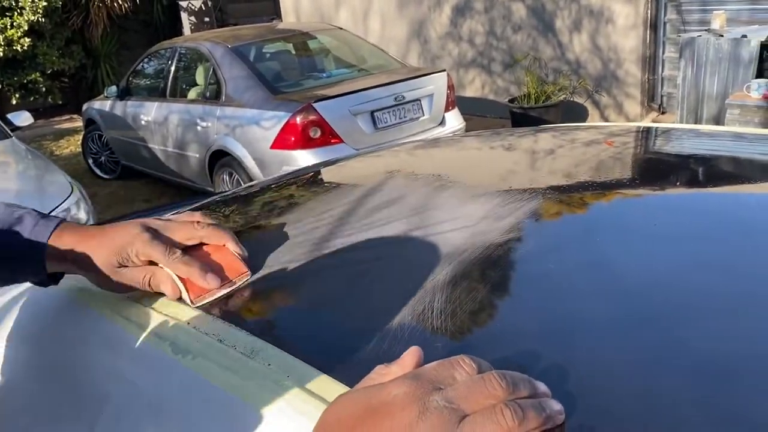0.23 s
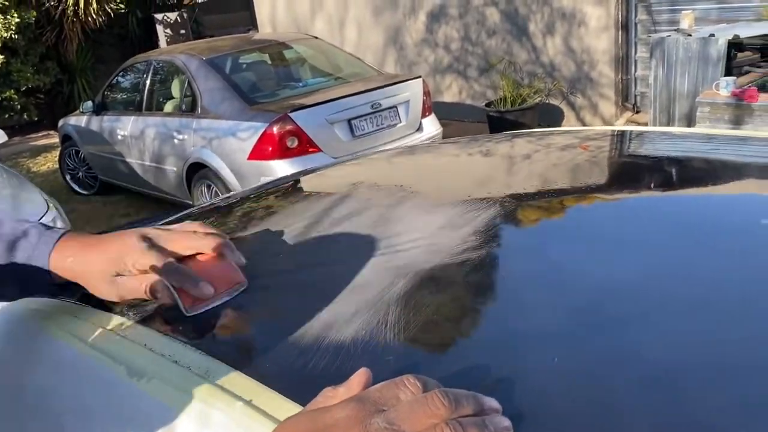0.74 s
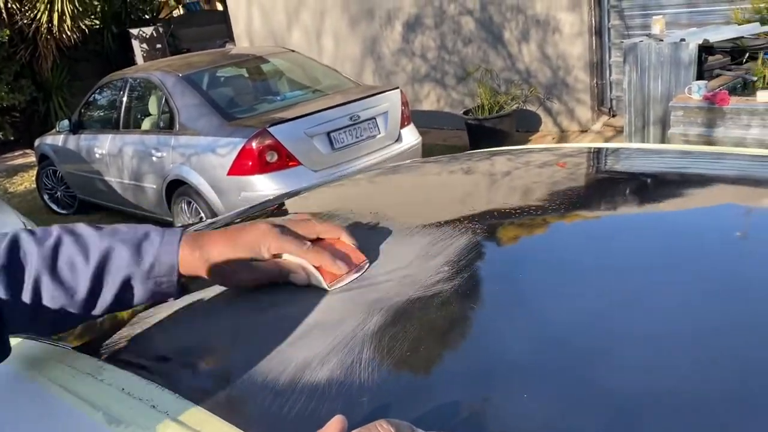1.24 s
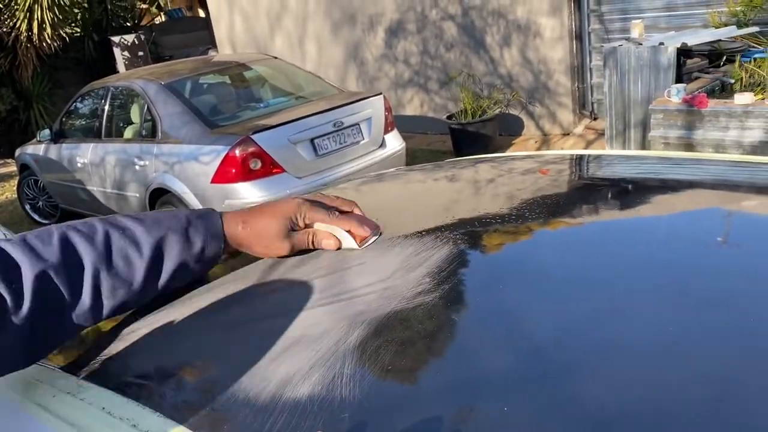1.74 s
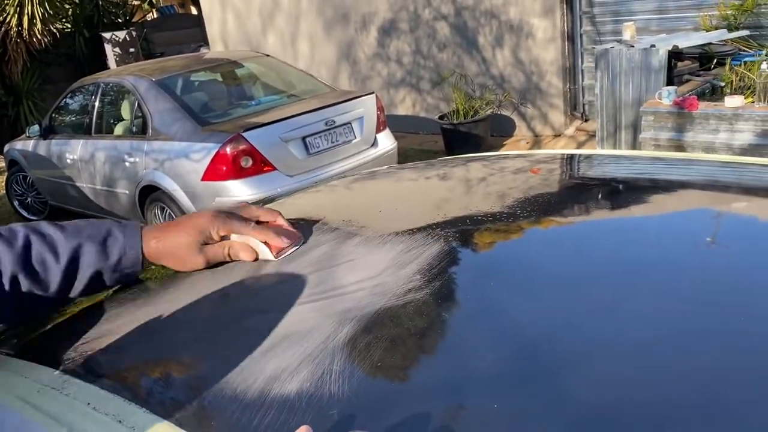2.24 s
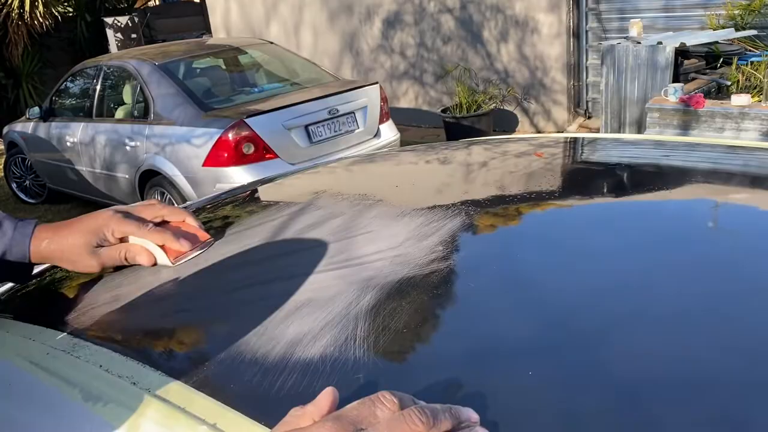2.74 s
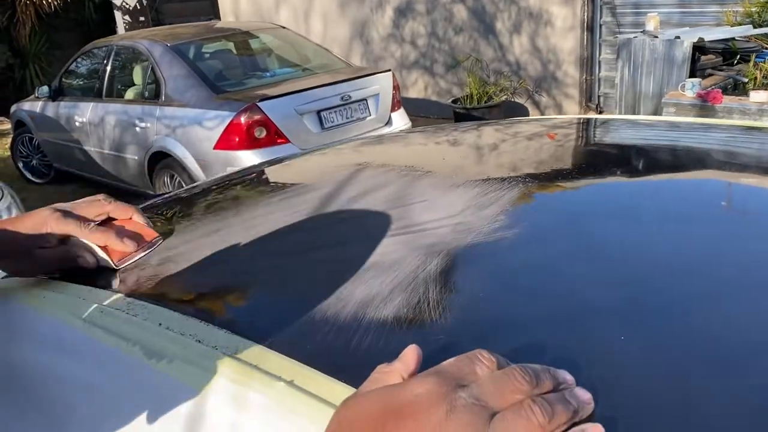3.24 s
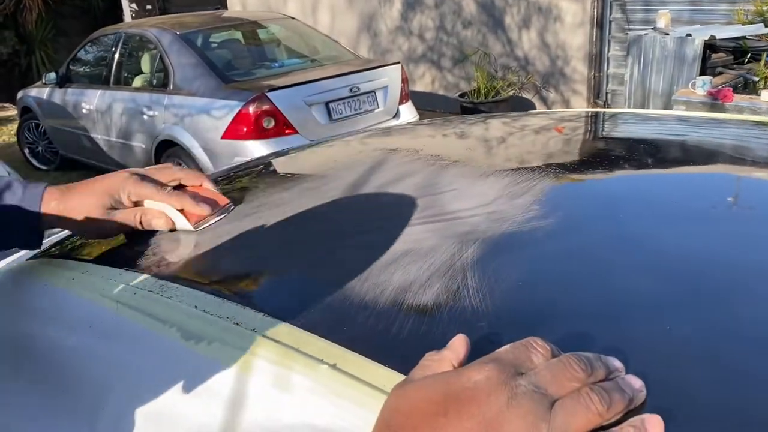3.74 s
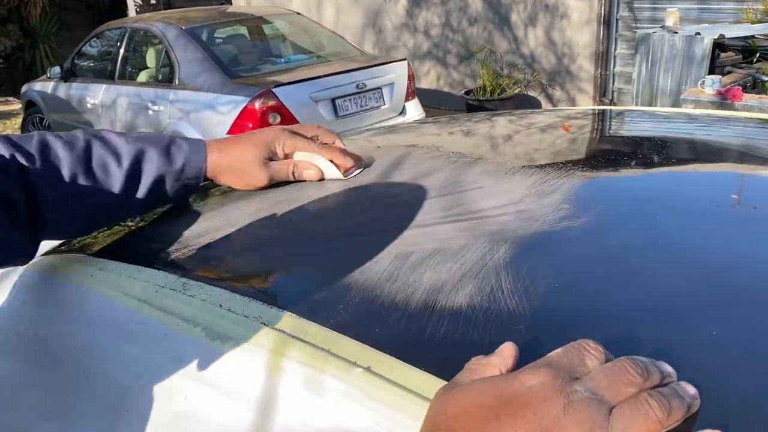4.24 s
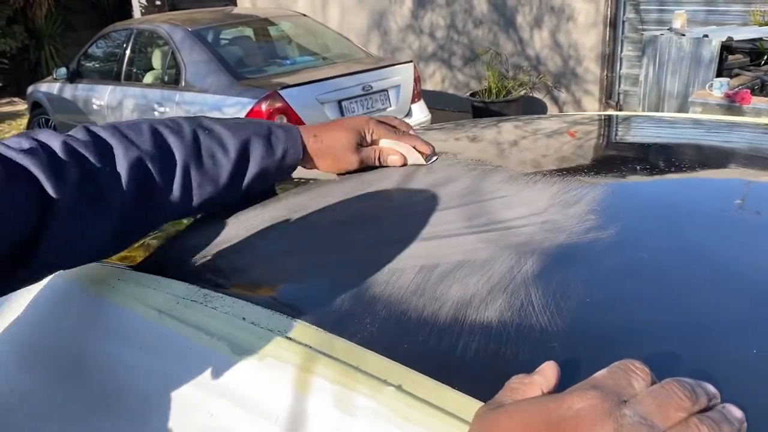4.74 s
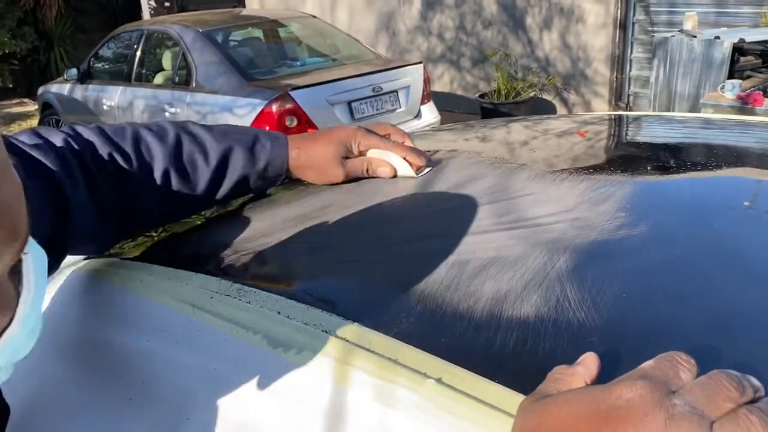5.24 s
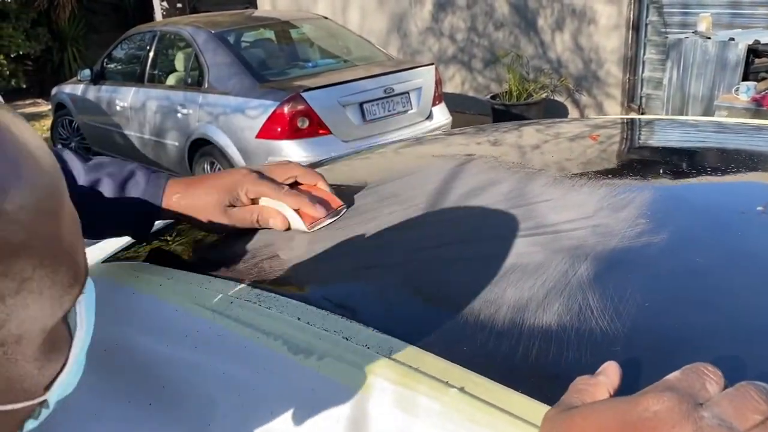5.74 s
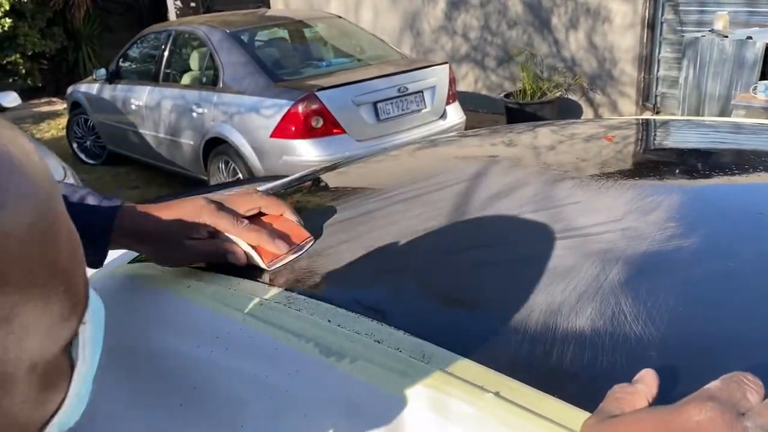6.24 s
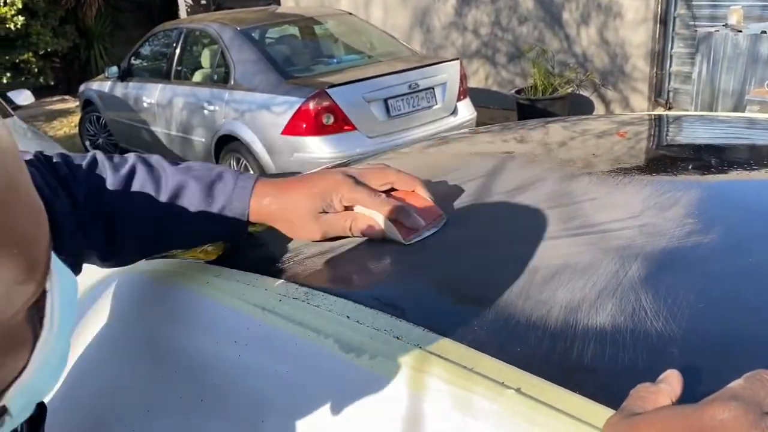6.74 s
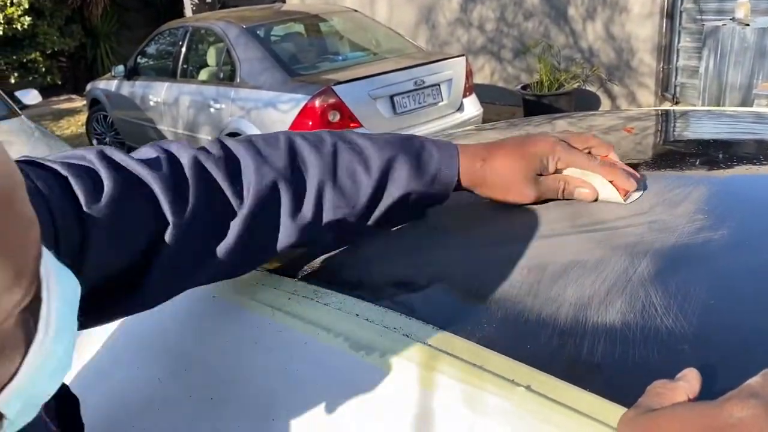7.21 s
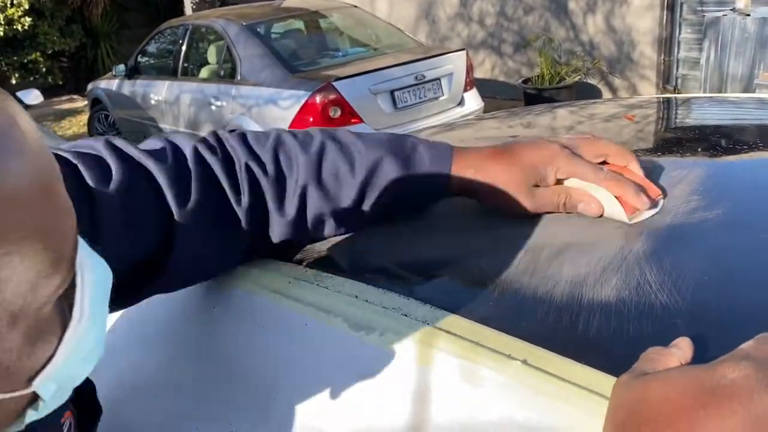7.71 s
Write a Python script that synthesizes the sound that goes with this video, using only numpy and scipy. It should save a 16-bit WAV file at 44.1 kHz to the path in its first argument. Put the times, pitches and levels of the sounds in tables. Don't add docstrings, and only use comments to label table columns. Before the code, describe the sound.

Rapid, dry, hissing sanding strokes on a car's sheet-metal roof swell and cut off at each turn, outdoors in a breezy yard.

```python
import sys
import numpy as np
from scipy import signal
from scipy.fft import rfft, irfft, next_fast_len
from scipy.io import wavfile

SR = 44100
rng = np.random.default_rng(int(sys.argv[2]) if len(sys.argv) > 2 else 0)


def generate_wav(sig):
    pcm = np.round(np.clip(np.atleast_2d(sig).T, -1, 1) * 32767).astype(np.int16)
    wavfile.write(sys.argv[1], SR, pcm)


def volts_from_db(level):
    exponent = np.asarray(level, float) / 20
    return 10 ** exponent


N = 351477
SIZE = next_fast_len(N + 4096)
HZ = np.maximum(np.arange(SIZE // 2 + 1) * SR / SIZE, 1)
STEP = 16
STEPS = np.arange(N // STEP + 2) * STEP / SR
LEFT_RIGHT = np.array([.5, -.5])


def rms_one(x):
    return x / np.sqrt(np.mean(x ** 2) + 1e-20)


def smooth(control):
    return np.interp(np.arange(N) / SR, STEPS, control)


def drift(rate_hz):
    r = np.exp(-2 * np.pi * STEP * rate_hz / SR)
    walk = signal.lfilter([1], [1, -2 * r, r * r], rng.standard_normal(len(STEPS) + 1000))
    return rms_one(walk[1000:])


def in_time(rows):
    start_s, *columns = np.transpose(rows)
    return [np.interp(STEPS, start_s, column) for column in columns]


def at_hz(rows, hz, column=1):
    table = np.array(rows)
    return np.interp(np.log(hz), np.log(table[:, 0]), table[:, column])


def shaped(x, response):
    return irfft(rfft(x, SIZE) * response, SIZE)[..., :N]


def peak(hz, width_hz):
    return 1 / (1 + 1j * (HZ ** 2 - hz ** 2) / (HZ * width_hz))


# pitch_hz, level_db (per Hz)
GRIT_COLOUR = [(500, -21.5), (1000, -14), (1500, -7.5), (2000, -4), (3000, -5.5), (4200, -6.5), (5400, -3),
               (6500, -3.5), (8000, -2.5), (9500, 0.5), (11500, 0), (13500, 0), (15500, -5.5)]
# pitch_hz, width_hz, level_db
SHEET_RINGS = [(1587, 200, -16.5), (1740, 96, -11.5), (2103, 424, -2.5), (2590, 220, -11), (8700, 1200, -4)]
# start_s, rasp_db, shift_db (rasp moved from 3 to 6 kHz in mid stroke), drone_db,
# speed_power (how much loudness hangs on speed)
TILT = [(0, -2, 0, -1.5, 1.7), (.55, 1, -1, -2.5, 1.36), (1.2, 2, 1, 2, 1.12), (1.9, 3, -0.5, 1.5, 1),
        (2.3, 3.5, 1, 3.5, 0.83), (2.8, 1, 1, 2.5, 1.16), (3.7, -0.5, 2.5, 0.5, 0.89), (4.6, -1, 4, 1.5, 1),
        (5.3, 0.5, 0.5, 2.5, 1.03), (5.9, -2, 1.5, 1.5, 0.89), (6.6, -1, -0.5, -1, 1.13),
        (7.2, -1.5, 0.5, -2, 1.28), (7.97, 0, -4, -3.5, 1.4)]


def sanding():
    speed, reach = block()
    grit_db, rasp_db, ring_db, drone_db = hand()
    tilt_db, shift_db, _, speed_power = in_time(TILT)
    rings = sum(volts_from_db(db) * peak(hz, width_hz) for hz, width_hz, db in SHEET_RINGS)
    colour = volts_from_db(at_hz(GRIT_COLOUR, HZ)) * (1 + rings)
    tear = (rfft(grains(22000, spread_db=2.0), SIZE) * colour).astype(np.complex64)
    centres_hz = np.geomspace(700, 14000, 11)
    place = np.interp(np.log(HZ), np.log(centres_hz), np.arange(len(centres_hz))).astype(np.float32)
    shared, own, together = 0, 0, drift(17)
    for k, hz in enumerate(centres_hz):
        window = np.cos(np.pi / 2 * np.clip(place - k, -1, 1)) ** 2
        band = irfft(tear * window, SIZE)[:, :N]

        sheet = np.interp(hz, [2300, 3200], [1, 0])
        bright = np.interp(hz, [5500, 8500], [0, 1])
        sheet_db = ring_db if hz > 1400 else drone_db
        tipped_db = tilt_db + shift_db * speed ** 2 * np.interp(hz, [3500, 5000], [-1, 1])
        level_db = grit_db + 6.5 + sheet * (sheet_db + 6)
        level_db = level_db + (1 - sheet - bright) * (rasp_db + 6 + tipped_db)
        faster = speed ** (speed_power * np.interp(np.log(hz), np.log([800, 12000]), [.75, .85]))
        gain = faster * volts_from_db(level_db + 0.22 * together + 2.1 * drift(14))

        near_far = [at_hz(PORTS, hz, column=2), at_hz(PORTS, hz, column=3)]
        alike = np.interp(reach ** np.interp(hz, [2500, 4000], [1, 3]), [0, 1], near_far)
        alike = np.clip(alike, 0, 1) / (1 + (0.17 / (speed + 1e-4)) ** 6)
        creep, creep_alike = volts_from_db(2 * (-80.5 - 6.5 * bright)), 0.1
        shared = shared + smooth(np.sqrt(alike * gain ** 2 + creep_alike * creep)) * band[0]
        own = own + smooth(np.sqrt((1 - alike) * gain ** 2 + (1 - creep_alike) * creep)) * band[1:]

    rocking = 0.067 * drift(15)
    heard = port_pair(shared, own, smooth((1 - reach) ** 1.4 + rocking))
    turned = heard * (volts_from_db(np.outer(LEFT_RIGHT, smooth(sideways(reach)))) - 1)
    return heard + shaped(turned, 1 / (1 + (HZ / 7800) ** 12) / (1 + (1800 / HZ) ** 4))


def grains(per_s, spread_db):
    size_draw, sign_draw, hit_draw = rng.random((3, 3, N), dtype=np.float32)
    sizes = volts_from_db(spread_db * np.minimum(-np.log(size_draw + 1e-9), 5)) * np.sign(sign_draw - .5)
    hits = hit_draw < per_s / SR
    return rms_one(sizes * hits * smooth(volts_from_db(0.59 * drift(108))))


# start_s (block breaks free), turn_db (grit at the turn),
# mid_db (grit halfway through the next stroke), ring_db (sheet re grit at the turn)
TURNS = [(-0.1, -21, -25, -7), (0.222, -36.5, -26, -7.5), (0.525, -29, -28.5, 4.5), (0.838, -41.5, -31, -3),
         (1.141, -30.5, -30.5, -4), (1.447, -42.5, -32.5, -7.5), (1.744, -38.5, -31.5, -2),
         (2.045, -44, -35, -13.5), (2.331, -40.5, -35.5, -8), (2.624, -44, -36.5, -11),
         (2.924, -33.5, -37.5, -10.5), (3.228, -41.5, -37, -8.5), (3.526, -40.5, -36.5, -7.5),
         (3.835, -41, -40.5, -11), (4.131, -37.5, -42, -14), (4.435, -37.5, -42, -12),
         (4.734, -36, -40, -11), (5.039, -39.5, -40.5, -11), (5.343, -35.5, -37.5, -7),
         (5.646, -41.5, -32, -12.5), (5.95, -39.5, -33.5, 0.5), (6.261, -41, -28.5, -10),
         (6.569, -34, -30, 3), (6.871, -41.5, -29, -4.5), (7.179, -29, -30, 3), (7.476, -41.5, -25.5, 0.5),
         (7.799, -26, -28, 5.5), (8.11, -27, -28, -5)]


def strokes():
    turn = np.arange(len(TURNS))
    stick_s = np.where(turn % 2, 0.0094, 0.016)
    return np.interp(STEPS, np.array(TURNS)[:, 0] - stick_s, turn)


def block():
    stroke = strokes()
    number = stroke.astype(int)
    push = number % 2
    since_free_s = STEPS - np.array(TURNS)[number, 0]
    slipping = np.clip(since_free_s / 0.0077 + .35, 0, 1) ** 2
    jerk = np.where(push, 0.33, 0.013) * np.exp(-np.maximum(since_free_s, 0) / 0.013)
    to_turn_s = (1 - stroke % 1) * 0.52
    drag = np.where(push, 0, 0.22) * np.exp(-to_turn_s / 0.016) * np.clip(to_turn_s / 0.0087, 0, 1)
    speed = (np.abs(np.sin(np.pi * stroke)) + jerk + drag) * slipping
    return speed, np.cos(np.pi * stroke / 2) ** 2


# press_share (part of it where the arm bears down most),
# damp_db (ring lost under the flat block)
STROKES = [(0.47, 9.5), (0.56, 15), (0.54, 16), (.5, 10.5), (0.52, 11.5), (0.54, 8), (0.41, 10),
           (0.76, 4.5), (0.35, 8.5), (0.63, 7), (0.57, 12), (0.63, 9), (0.33, 14), (.55, 0.5), (0.74, 3.5),
           (0.49, 5.5), (0.57, 6), (0.32, 5), (0.28, 5), (0.79, 2.5), (0.33, 4), (0.71, 2.5), (0.43, 6),
           (0.49, 4.5), (0.56, 8), (0.57, 14), (0.54, 9.5), (.5, 6)]
BITE = [-0.81, -0.54, -1.7, -0.055, .3, -0.26, .3, 0.025, -0.75, 0.6, .6, -.4, 0.83, -0.27, -0.14, -0.54,
        -.4, -0.55, -.4, -.4, -.4, 0.25, -1, -.4, -0.69, 0.52, -0.66, -.4]


def hand():
    stroke = strokes()
    number = stroke.astype(int)
    _, turn_db, mid_db, free_db = np.transpose(TURNS)
    press_share, damp_db = np.transpose(STROKES)
    turn = np.arange(len(TURNS))
    knots = np.ravel([turn, turn + np.clip(press_share, .1, .9)], order="F")
    grit_db = np.interp(stroke, knots, np.ravel([turn_db, mid_db], order="F"))
    mid, pull = np.sin(np.pi * stroke) ** 2, 1 - number % 2
    ring_db = np.interp(stroke, turn, free_db) - mid * damp_db[number]
    rasp_db = -2.5 + 0.35 * ring_db + np.array(BITE)[number] * mid
    drone_db = -0.5 + 0.52 * ring_db - 4 * mid * pull + in_time(TILT)[2]
    return grit_db, rasp_db, ring_db, drone_db


# start_s, near_end_db, middle_db, far_end_db
STANCE = [(0, 9, 6, 3), (.6, 11, 4.4, 2), (1.1, 3, 6.2, 4.5), (1.9, 1, 5.3, 5.5), (2.6, 2, 2.3, 4.5),
          (3.4, 0.4, 9.3, 8), (4.5, 3, 4.8, 6), (5.3, 8, 3.4, 1.5), (5.9, 4, 4.4, -1), (6.6, 7.5, 2, -1.5),
          (7.97, 7, 1.7, -1)]


def sideways(reach):
    near_db, mid_db, far_db = in_time(STANCE)
    near_half = near_db + 2 * reach * (mid_db - near_db)
    far_half = far_db + 2 * (1 - reach) * (mid_db - far_db)
    return np.where(reach < .5, near_half, far_half)


# pitch_hz, lead_rad (right port ahead), alike_near (0-1), alike_far (0-1), left_right_db
PORTS = [(300, .3, .8, .8, -.5), (800, .4, .4, .75, -3), (1800, -.3, .15, .85, -2),
         (3000, -1.3, .35, .5, 1), (4400, -.1, .92, .55, -1), (5600, -.3, .65, .55, 1),
         (6900, 0.1, .98, .9, -1), (8500, 3.1, .985, .985, 0), (10150, 6.28, .995, .995, 0),
         (11650, 9.36, .998, .998, 0), (12550, 9.5, .998, .998, 0), (13600, 12.4, .995, .995, 0),
         (14400, 12.75, .995, .995, 0), (15400, 15.71, .998, .998, 0)]
# pitch_hz, lead_rad, left_right_db
NEAR_SHIFT = [(1200, -0.13, 7), (2000, -1.1, -4), (3020, -0.9, 9), (3980, 0.92, 1.5), (5560, -1.3, -2.5),
              (8000, 0.4, 0.5), (11500, -0.31, -5.5), (13500, -0.95, 4), (14900, 0, -6)]


def port_pair(shared, own, near):
    port_hz, port_lead = np.array(PORTS)[:, :2].T
    lead = np.exp(-1j * np.outer(LEFT_RIGHT, np.interp(HZ, port_hz, port_lead)))
    moved = np.exp(-1j * np.outer(LEFT_RIGHT, at_hz(NEAR_SHIFT, HZ)))
    moved = moved * volts_from_db(np.outer(LEFT_RIGHT, at_hz(NEAR_SHIFT, HZ, column=2)))
    both = rfft(shared * (1 - near), SIZE) + rfft(shared * near, SIZE) * moved
    both = both * lead + rfft(own, SIZE)
    return irfft(both * volts_from_db(np.outer(LEFT_RIGHT, at_hz(PORTS, HZ, column=4))), SIZE)[:, :N]


# start_s, level_db (peak), pitch_hz, left_right_db, rise_s
KNOCKS = [
    (0.039, -37, 1150, 5, .0008),
    (0.257, -35, 950, 5, .0006),
    (0.593, -38, 1200, 11, .001),
    (0.797, -39.5, 1340, -4, 0.0028),
    (2.811, -44, 1130, -1, .003),
    (3.221, -44, 690, -3, 0.0015),
    (4.992, -40, 1400, -8, 0.0022),
    (7.104, -41, 1290, -3.5, .0018),
]


def knocks():
    out, t = np.zeros((2, N + SR)), np.arange(round(.03 * SR)) / SR
    for start_s, db, hz, pan_db, rise_s in KNOCKS:
        ring = np.sin(2 * np.pi * hz * t) * (t / rise_s) * np.exp(1 - t / rise_s)
        start = round(start_s * SR)
        out[:, start:start + len(t)] += volts_from_db(db - 1.0 + LEFT_RIGHT[:, None] * pan_db) * ring
    return out[:, :N]


# peak_s, rumble_db, flutter_db, fall_s
GUSTS = [(.0, -43, -51, 0.036), (.18, -54, -62, 0.018), (.27, -49, -62, 0.033), (.47, -54, -60, .015),
         (.56, -43.5, -47.5, .07), (.88, -43.5, -53, 0.033), (1.11, -48, -55, .05), (1.51, -43, -60, 0.05),
         (1.81, -47, -65, 0.021), (2.04, -41.5, -58, 0.03), (2.168, -32.5, -39.5, 0.036),
         (2.4, -35.5, -44, 0.045), (2.48, -33, -58, 0.018), (2.62, -39.5, -56, 0.049),
         (2.81, -47, -53, 0.03), (3.3, -51, -53, 0.046), (3.44, -37, -63, 0.016), (3.75, -48, -56, .04),
         (4.0, -47.5, -66, 0.12), (4.36, -50, -65, 0.051), (4.75, -46.5, -62, .04), (5.33, -48, -50, 0.06),
         (5.98, -41, -53, .03), (6.402, -41.5, -63, 0.018), (6.59, -46, -49, 0.054),
         (6.87, -40.5, -50, 0.03), (7.18, -38.5, -42, 0.064), (7.411, -34.5, -42.5, 0.018),
         (7.5, -35, -45, 0.02), (7.81, -33, -39, 0.015)]


def gusts():
    peak_s, rumble_db, flutter_db, fall_s = np.transpose(GUSTS)[:, :, None]
    width_s = fall_s * np.where(STEPS < peak_s, 0.95, 1)
    bell = np.exp(-((STEPS - peak_s) / width_s) ** 2)

    def over_breeze(breeze_db, gust_db):
        return np.sqrt(volts_from_db(2 * breeze_db) + (volts_from_db(2 * gust_db) * bell).sum(axis=0))

    return over_breeze(-51, rumble_db), over_breeze(-55.5, flutter_db)


def wind():
    rumble_gain, flutter_gain = gusts()
    white = rng.standard_normal((2, 3, N // STEP + 2))
    air = white[:, :1] + 0.39 * white[:, 1:]
    low = signal.butter(2, [47, 95], "band", fs=SR / STEP, output="sos")
    high = signal.butter(2, [105, 175], "band", fs=SR / STEP, output="sos")
    rumble = rms_one(signal.sosfilt(low, air[0]))
    flutter = rms_one(signal.sosfilt(high, air[1]))
    gust = volts_from_db(0.44 * drift(21)) * (rumble_gain * rumble + flutter_gain * flutter)
    return signal.resample_poly(gust, STEP, 1, axis=1)[:, :N]


# pitch_hz, level_db (per Hz)
YARD_COLOUR = [(120, -3), (230, 0.5), (300, 3.5), (450, -6), (800, -5.5), (1050, -12), (1500, -10.5),
               (2500, -16.5), (4200, -14), (6000, -26.5), (16000, -63)]
# pitch_hz, width_hz, level_db (re traffic)
HUMS = [(146, 8.6, 11), (276.5, 6.8, -4.5)]


def yard():
    white = rfft(rng.standard_normal((3, N)), SIZE)
    alike = at_hz([(300, 0.68), (700, 0.14), (3000, 0.1)], HZ)
    spread = white[:1] * np.sqrt(alike) + white[1:] * np.sqrt(1 - alike) * volts_from_db([[-.8], [.8]])
    hums = 1 + sum(volts_from_db(db) * np.abs(peak(hz, width_hz)) for hz, width_hz, db in HUMS)
    colour = hums * volts_from_db(at_hz(YARD_COLOUR, HZ)) / (1 + (100 / HZ) ** 4)
    air = irfft(spread * colour, SIZE)[:, :N]
    return smooth(volts_from_db(-50.5 + 2.0 * drift(4.7))) * rms_one(air)


def scene():
    return sanding() + knocks() + wind() + yard()


def low_pass(x):
    return signal.sosfilt(signal.butter(12, 16050, fs=SR, output="sos"), x)


def record(dry):
    mix = shaped(dry, 1 / (1 + (HZ / 15900) ** 400))
    return low_pass(mix)


dry = scene()
out = record(dry)
generate_wav(out)
```